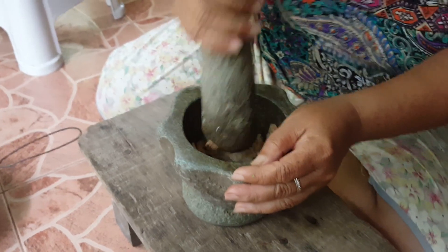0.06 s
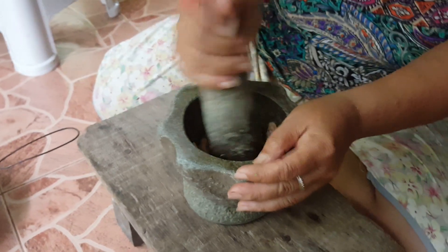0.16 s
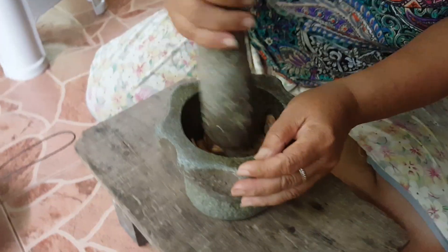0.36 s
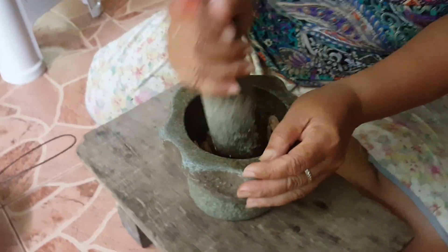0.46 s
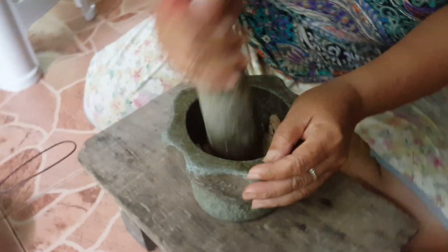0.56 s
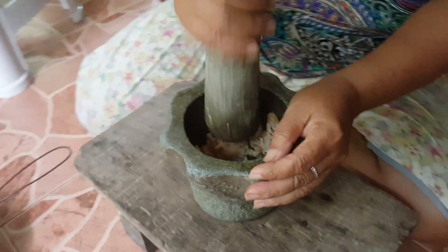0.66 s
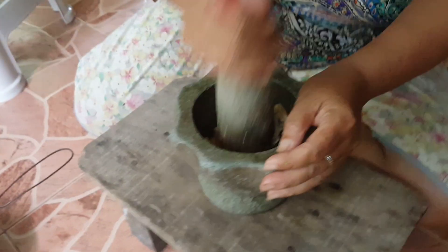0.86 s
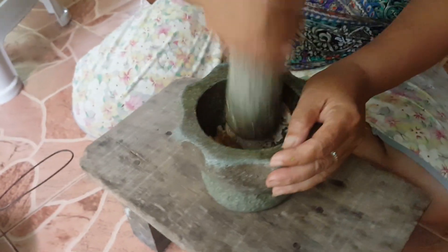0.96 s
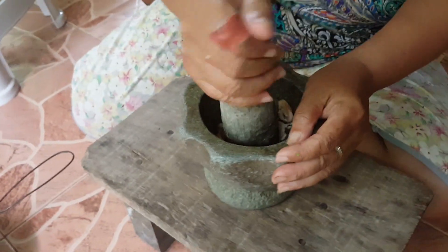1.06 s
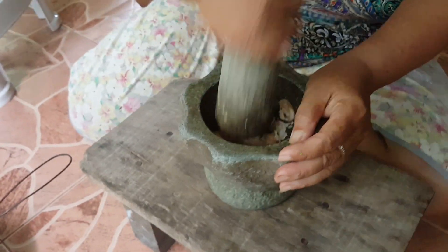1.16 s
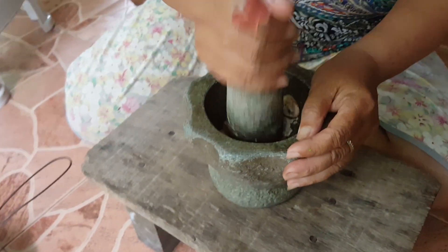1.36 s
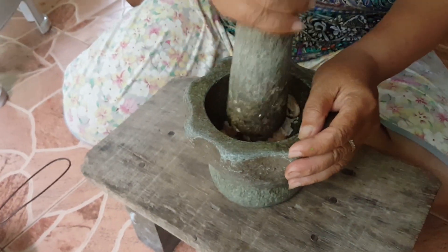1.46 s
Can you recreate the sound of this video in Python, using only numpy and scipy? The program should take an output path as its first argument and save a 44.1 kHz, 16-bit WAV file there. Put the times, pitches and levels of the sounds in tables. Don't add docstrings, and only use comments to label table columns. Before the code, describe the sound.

A stone pestle pounds food in a stone mortar, sharp knocks ringing in a hard-walled kitchen

```python
import sys
import numpy as np
from scipy import signal
from scipy.fft import rfft, irfft, next_fast_len
from scipy.io import wavfile

SR = 44100
rng = np.random.default_rng(int(sys.argv[2]) if len(sys.argv) > 2 else 0)


def store_wav(level_fs):
    pcm = np.round(np.clip(np.atleast_2d(level_fs), -1, 1) * 32767)
    wavfile.write(sys.argv[1], SR, pcm.T.astype(np.int16))


def to_linear_factor(level_db):
    exponent = np.asarray(level_db, float) / 20
    return 10 ** exponent


N = 66150
EARLY_S = 0.1
M = N + round(EARLY_S * SR)
BLOW_LEN = SR // 8

# hz, density_db_per_hz
AIR_SPECTRUM = [(20, 2.5), (45, -4), (100, -5.5), (160, -7), (280, -14.5), (450, -21.5), (900, -30),
                (16000, -50)]
# hz, width_hz, level_db
HUM_BANDS = [(96, 30, -55), (430, 66, -74.5), (5955, 640, -76.5), (7900, 900, -80), (9150, 700, -84)]
# start_s, push_db, contact_ms, loaded_top_hz, upper_modes_db
STOOL_PUSHES = [
    (-.072, -4, 0.33, 300, 3),
    (.2088, -8, 1, 374.6, -5.5),
    (0.4861, -11.5, 0.47, 383.4, -3),
    (.7645, -29, 0.91, 400, -9),
    (0.7909, -15, .9, 478, -9.5),
    (1.0486, -17, 1, 350, 4.5),
    (1.3238, -24, 0.85, 296, -1.5),
]
# start_s, bowl_db, damping_factor, pestle_db
STONE_CONTACTS = [
    (-.072, 2, 0.96, -12),
    (0.2088, 6.5, 1.2, -5),
    (0.4864, -29.5, 2.8, -69),
    (1.0485, 3, 1.5, -14),
    (1.323, -29.5, 5.4, -71),
]
# hz, width_hz, level_db
STOOL_MODES = [(552, 250, 4), (877, 180, 1), (1230, 750, -10.5), (1650, 300, -6)]
# hz, width_hz, level_db
BOWL_MODES = [(1097, 200, -5.5), (2169, 554, 6), (2610, 290, -20.5), (3200, 350, -20)]
# hz, width_hz, level_db
PESTLE_MODES = [(4855, 65, 0), (4862, 9, -25), (6300, 300, -22), (9100, 400, -22)]
# start_s, rise_s, t60_s, level_db
FOOD_CRUSHES = [
    (-.072, 0.0023, 0.034, -8),
    (0.2095, 0.0008, 0.0092, -21.5),
    (.4842, 0.00079, 0.013, -21),
    (0.7539, 0.0075, 0.015, -37.5),
    (0.7664, .0015, .012, -37.5),
    (.7720, 0.0048, 0.025, -32.5),
    (0.781, 0.0059, 0.023, -37),
    (1.0473, 0.000505, .02, -35.5),
    (1.3200, 0.001, .03, -26),
]
# hz, level_db
GRAIN_SPECTRUM = [(400, -4), (1500, -2.5), (4000, 2.5), (6500, -2.5), (9000, 4), (11000, -1.5), (13000, -2),
                  (16000, -11.5)]
WALL_DELAYS = [.0030, .0060, .0117, .0135, .0175, .0245, .027, .0335]
# level_db, right_after_left_ms
WALL_ECHOES = [(-12, 0.12), (-17, -0.18), (-6, .06), (-5, -0.24), (-8, 0.081), (-13, 0.018), (-11, .2),
               (-15.5, -.2)]
# hz, t60_s
NEAR_DECAY = [(100, 0.9), (400, 0.15), (1500, 0.11), (5000, 0.19), (14000, 0.083)]
# hz, t60_s
FAR_DECAY = [(100, 0.37), (500, 0.51), (2000, 0.47), (5000, 0.48), (14000, 0.62)]
# hz, level_db
TAIL_SPECTRUM = [(60, -23), (300, -5), (700, 0.5), (1500, -2.5), (2500, -4), (4000, -8.5), (8000, -13.5),
                 (15000, -1)]
# hz, likeness_0_to_1
STEREO_LIKENESS = [(60, .99), (300, 0.7), (950, 0.66), (3770, .1), (15000, .05)]
# hz, level_db, t60_s
LOW_MODES = [(92, -10, 0.9), (102.8, 4.5, .25), (135.3, -4.5, 0.53), (173.3, -7.5, 0.21), (187, 5.5, 0.3),
             (284.6, -11, 0.36), (300, -5.5, 0.36), (349, 5, 0.17), (436, -2.5, 0.33), (485, -13.5, 0.083),
             (563, -10.5, 0.17), (623, -12, 0.083), (947.6, -15, .2), (970, -13.5, 0.4)]
# hz, left_minus_right_db
PORT_LEAN = [(100, 0), (1200, 2.2), (2500, .1), (5000, -1.9), (12000, -1.5)]


def unit(x):
    return x / np.sqrt(np.mean(x ** 2) + 1e-20)


def along(points, hz):
    f, v = np.transpose(points)
    return np.interp(np.log(hz + 1), np.log(f + 1), v)


def filtered(x, response):
    n = x.shape[-1]
    m = next_fast_len(n + SR // 2)
    hz = np.fft.rfftfreq(m, 1 / SR)
    return irfft(rfft(x, m) * response(hz), m)[..., :n]


def paired(two, alike):
    def mid_side(hz):
        angle = np.arccos(np.clip(along(alike, hz), -1, 1)) / 2
        return np.array([np.cos(angle), np.sin(angle)])

    mid, side = filtered(two, mid_side)
    return np.array([mid + side, mid - side])


def background():
    def noise(shape):
        return unit(paired(filtered(rng.standard_normal((2, M)), shape), STEREO_LIKENESS))

    out = to_linear_factor(-52.5) * noise(lambda f: to_linear_factor(along(AIR_SPECTRUM, f)))
    for hz, width_hz, db in HUM_BANDS:
        out += to_linear_factor(db) * noise(lambda f: 1 / (1 + ((f - hz) * 2 / width_hz) ** 2))
    return out


def body(modes, damping=1):
    t = np.arange(BLOW_LEN) / SR
    out = np.zeros(BLOW_LEN)
    for hz, width_hz, db in modes:
        decay_db_per_s = width_hz * damping * np.pi * 20 / np.log(10)
        out += to_linear_factor(db - decay_db_per_s * t) * np.sin(2 * np.pi * hz * t)
    return out


def stool_thuds():
    out, t = np.zeros(M + SR), np.arange(256) / SR
    for start_s, push_db, contact_ms, top_hz, upper_db in STOOL_PUSHES:
        force = np.sin(np.pi * np.clip(t / (contact_ms / 1000 + 1 / SR), 0, 1)) ** 2
        top_width_hz = 80
        wood = body([(top_hz, top_width_hz, 0)]) + to_linear_factor(upper_db) * body(STOOL_MODES)
        thud = np.convolve(force / force.sum(), wood)[:BLOW_LEN]
        i = round((start_s + EARLY_S) * SR)
        out[i:i + BLOW_LEN] += to_linear_factor(push_db) * thud
    return out[:M]


def stone_clinks():
    out = np.zeros(M + SR)
    for start_s, bowl_db, damping, pestle_db in STONE_CONTACTS:
        i = round((start_s + EARLY_S) * SR)
        out[i:i + BLOW_LEN] -= to_linear_factor(bowl_db) * body(BOWL_MODES, damping) + to_linear_factor(pestle_db) * body(PESTLE_MODES)
    contact_hz = 6500
    return filtered(out[:M], lambda hz: 1 / (1 + 1j * hz / contact_hz))


def crush():
    grains_per_s, spread_db, bed = 4000, 2.8, 0.6
    t, draw = np.arange(M) / SR - EARLY_S, rng.random((2, M))
    heights = to_linear_factor(-spread_db * np.log(draw[1] + 1e-3))
    spikes = (draw[0] < grains_per_s / SR) * heights + bed
    grains = unit(filtered(spikes * rng.standard_normal(M), lambda hz: to_linear_factor(along(GRAIN_SPECTRUM, hz))))
    envelope = np.zeros(M)
    for start_s, rise_s, t60_s, db in FOOD_CRUSHES:
        late_s = np.maximum(t - start_s, 0)
        swell = np.clip(late_s / rise_s, 0, 1) ** 2
        envelope += to_linear_factor(db - 60 * np.maximum(late_s - rise_s, 0) / t60_s) * swell
    return grains * envelope


def wall_echoes(x):
    dull_hz = 1000

    def response(hz):
        total = 0
        for delay_s, (db, skew_ms) in zip(WALL_DELAYS, WALL_ECHOES):
            ports_s = delay_s + np.array([[0], [skew_ms / 1000]])
            total = total + to_linear_factor(db) * np.exp(-2j * np.pi * hz * ports_s)
        return total / (1 + 1j * hz / dull_hz) ** 2

    return filtered(x, response)


def tail(decay):
    gap_s, rise_s = 0.004, 0.006
    hz, t, z = signal.stft(rng.standard_normal((2, SR)), SR, nperseg=256)
    db = along(TAIL_SPECTRUM, hz)[:, None] - 60 * t / along(decay, hz)[:, None]
    x = signal.istft(z * to_linear_factor(db), SR, nperseg=256)[1]
    rise = 1 - np.exp(-np.arange(x.shape[1]) / SR / rise_s)
    x = paired(x * rise, STEREO_LIKENESS)
    return np.pad(x / np.linalg.norm(x[0]), ((0, 0), (round(gap_s * SR), 0)))


def kitchen(x, push):
    response = to_linear_factor(-9.5) * tail(NEAR_DECAY) + to_linear_factor(-18.5) * tail(FAR_DECAY)
    tails = signal.fftconvolve(x[None], response, axes=1)[:, :M]
    t, longest_t60_s, mode_rise_s = np.arange(SR) / SR, 0.33, 0.0063
    modes = np.zeros(SR)
    for hz, db, t60_s in LOW_MODES:
        modes += to_linear_factor(db - 60 * t / min(t60_s, longest_t60_s)) * np.sin(2 * np.pi * hz * t)
    modes *= 1 - np.exp(-t / mode_rise_s)
    return tails + to_linear_factor(-52.5) * signal.fftconvolve(push, modes)[:M]


def seed_snap():
    start_s, level_db, width_ms, top_hz = 0.35740, -19, 0.2, 7000
    u = (np.arange(M) / SR - EARLY_S - start_s) * 1000 / width_ms
    snap = -to_linear_factor(level_db) * (u >= 0) * (1 - u) * np.exp(-np.abs(u))
    return filtered(snap, lambda hz: 1 / (1 + 1j * hz / top_hz) ** 2)


def ports(hz):
    lag_s = 0.000019
    left = to_linear_factor(along(PORT_LEAN, hz)) ** 0.5 * np.exp(1j * np.pi * hz * lag_s)
    return np.array([left, 1 / left])


def scene():
    air = background()
    wood = stool_thuds()
    radiates_hz = 216
    near = filtered(wood + stone_clinks() + crush(), lambda hz: (1j * hz / (radiates_hz + 1j * hz)) ** 2)
    direct = filtered(near + wall_echoes(near) + seed_snap(), ports)
    return (direct + kitchen(near, wood) + air)[:, -N:]


def band_limit(x):
    return signal.sosfilt(signal.butter(12, 16440, fs=SR, output="sos"), x)


def record(dry):
    low_cut_hz, top_hz, ceiling, knee = 85, 16300, 1.03, 8
    x = filtered(dry, lambda hz: (1j * hz / (low_cut_hz + 1j * hz)) ** 2)
    x = x / (1 + np.abs(x / ceiling) ** knee) ** (1 / knee)
    return band_limit(filtered(x, lambda hz: hz < top_hz))


dry = scene()
out = record(dry)
store_wav(out)
```